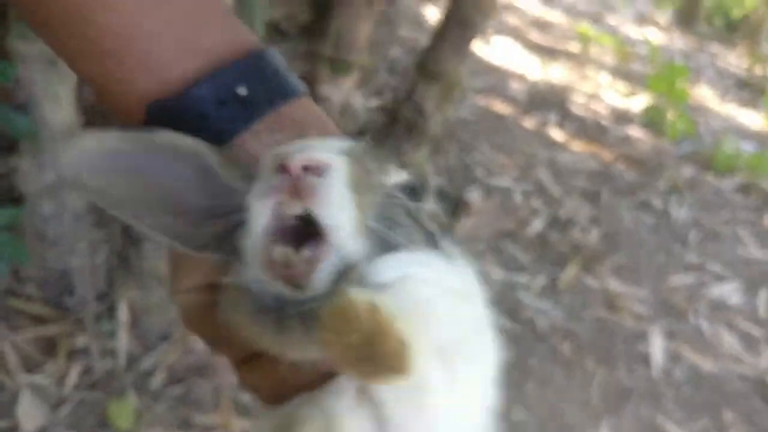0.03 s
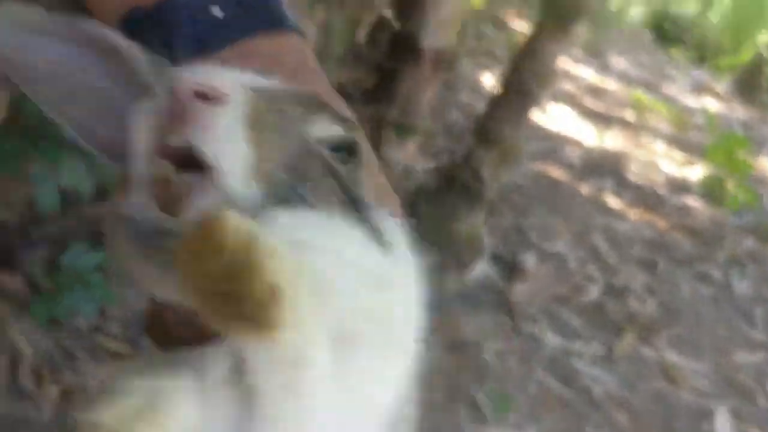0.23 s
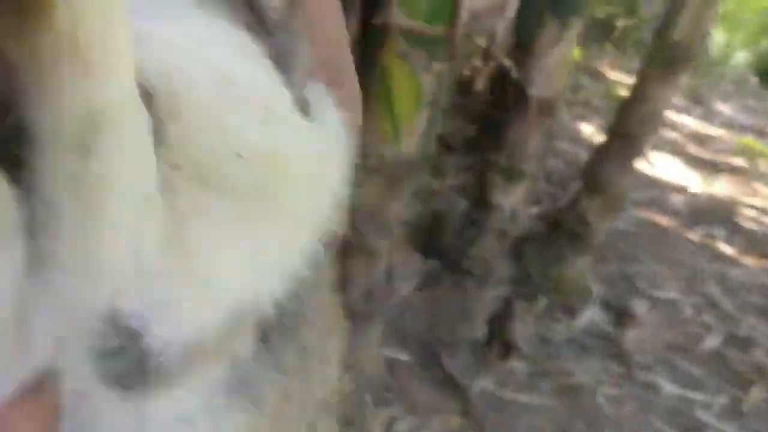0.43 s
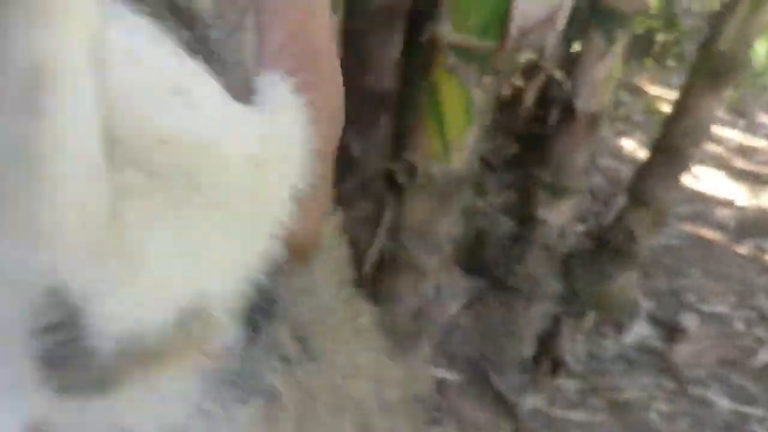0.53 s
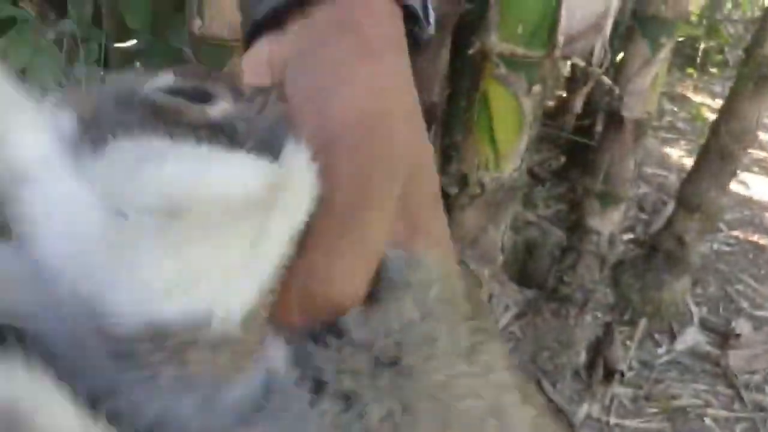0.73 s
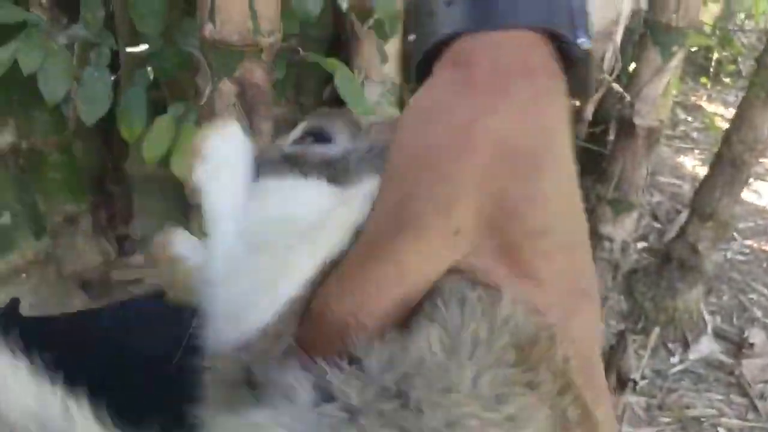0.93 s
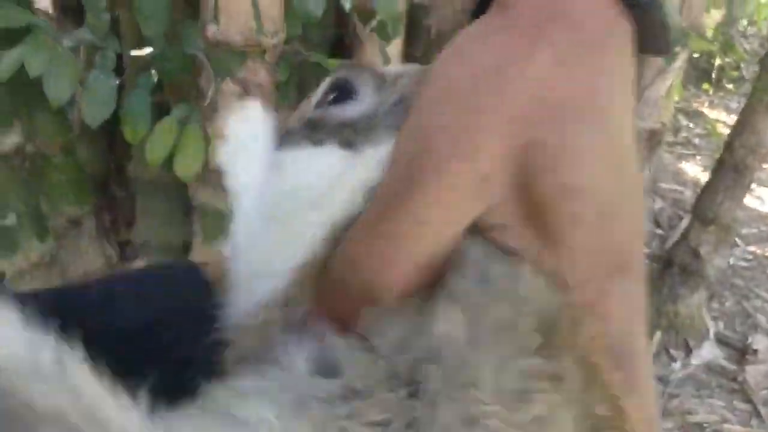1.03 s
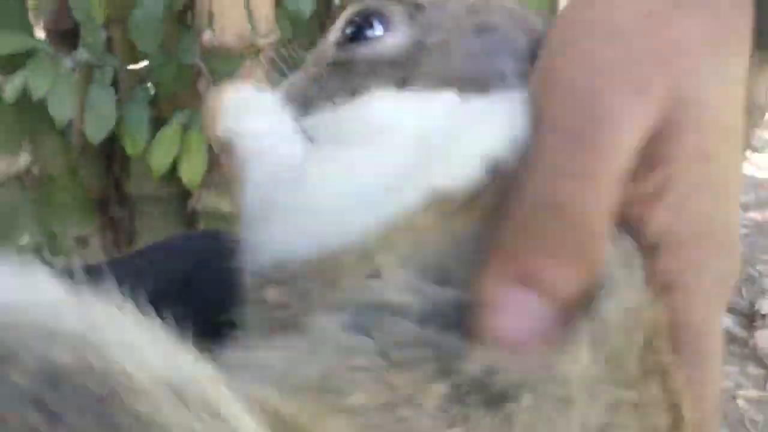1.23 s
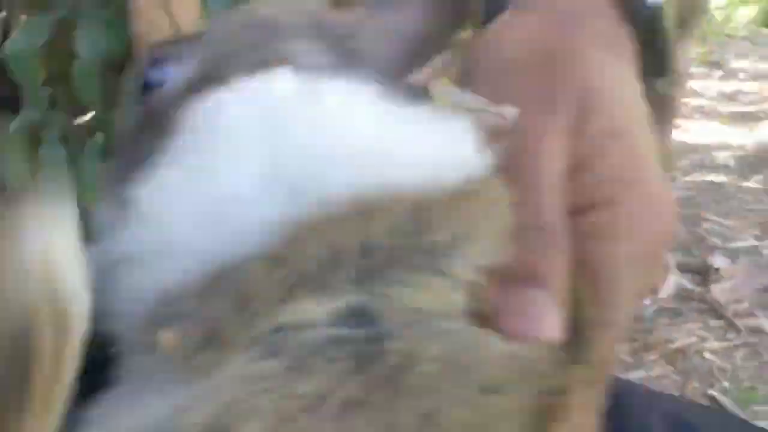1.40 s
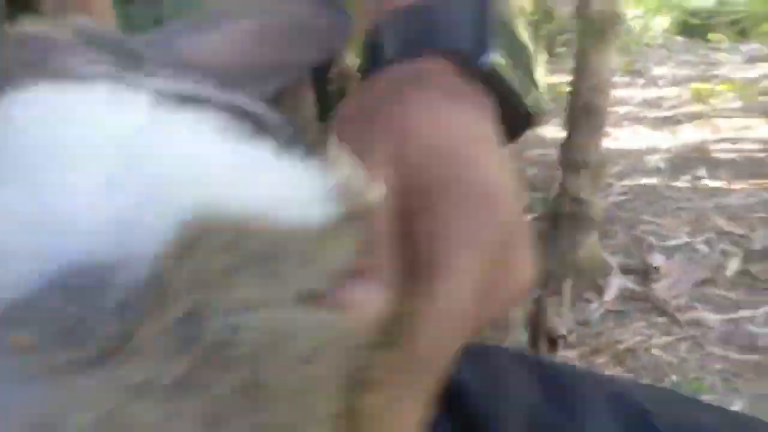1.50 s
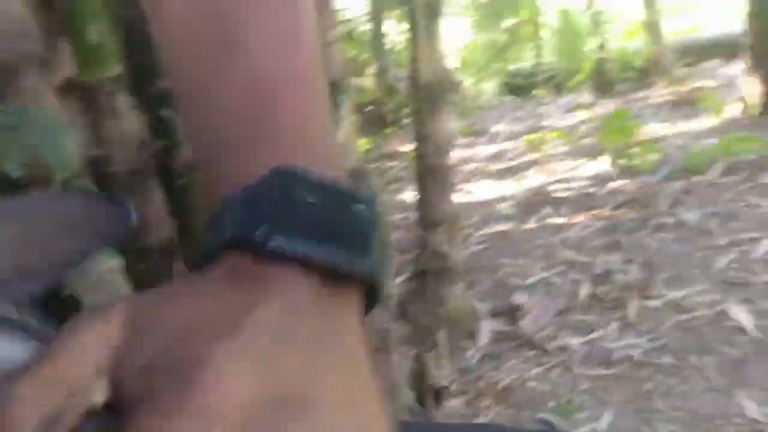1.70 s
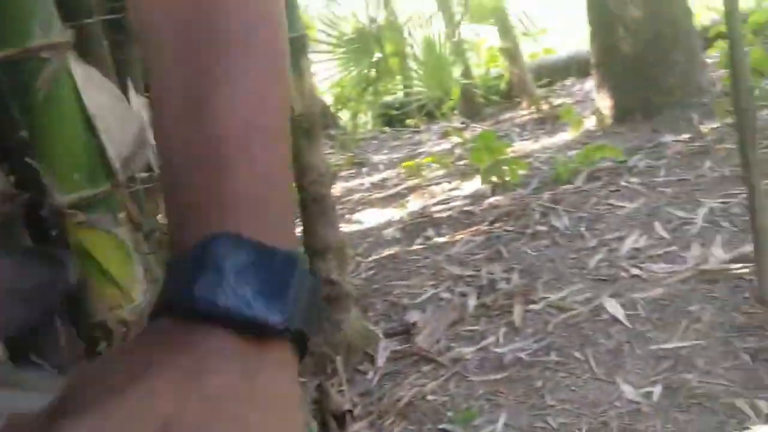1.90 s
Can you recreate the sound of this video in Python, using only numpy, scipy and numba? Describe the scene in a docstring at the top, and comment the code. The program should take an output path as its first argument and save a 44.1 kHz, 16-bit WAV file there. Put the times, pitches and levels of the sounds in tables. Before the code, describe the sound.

A rabbit screams three times, close and shrill. From about 0.15 seconds a faint, thin whistle rises and wavers, bursting at 0.5 into a short, bright, piercing rasp until 0.63. A longer, rough, fluttering squeal runs from 0.78 to 1.19. The third, from 1.41 to 1.76, briefly clears to a whistle, then rasps and drops. Faint rumble, hiss and soft bumps fill the quiet woodland gaps.

```python
"""Rabbit screaming in woodland

A held rabbit screams three times, close to a phone's microphone among quiet trees.
Its voice is a thin clean whistle of harmonics that breaks into a rasp, where a slower, unsteady
flutter of the throat chops the tone and the rushing air, and moving resonances of the mouth ring.
A short diffuse smear blurs the rasp's treble, and trunks return a faint echo.
Behind it lie a low wavering rumble, a faint hiss and soft bumps."""
import sys
import numpy as np
from scipy import signal
from scipy.fft import rfft, irfft
from scipy.io import wavfile
from scipy.ndimage import uniform_filter1d, minimum_filter1d
from numba import njit

SR = 44100
rng = np.random.default_rng(int(sys.argv[2]) if len(sys.argv) > 2 else 0)


def master_out(mix):
    """Clip the mix to full scale and print it as 16-bit PCM to the path in sys.argv[1]."""
    frames = np.transpose(np.atleast_2d(mix))
    ceiling = np.clip(frames, -1, 1)
    pcm = np.round(ceiling * 32767).astype(np.int16)
    wavfile.write(sys.argv[1], SR, pcm)


N = 85995  # length in samples

# Clean whistling, one table per stretch, levels before the whistle's own gain:
# (time [s], pitch [Hz], first harmonic [dB], second harmonic [dB])
WHISTLES = [
    [(0.145, 1236, -41.5, -43), (0.173, 1488, -31, -28.5), (0.201, 1615, -35, -25), (0.249, 1653, -30, -28),
     (0.327, 1498, -31, -29), (0.379, 1692, -26.5, -20), (0.425, 1619, -27.5, -25.5),
     (0.461, 1651, -28.5, -21.5), (0.475, 1561, -32.5, -22), (0.5, 1610, -24.5, -13)],
    [(1.48, 1896, -23, -36), (1.494, 1845, -25, -32), (1.538, 1855, -24.5, -42.5),
     (1.548, 1940, -17.5, -59)],
]
# Throat and mouth during the rasp, one table per cry:
# (time [s], pitch [Hz], flutter [Hz], mouth resonance [Hz], roughness [0 = smooth])
THROAT = [
    [(.498, 1677, 620, 3100, 0.19), (.514, 1740, 685.2, 3260, 0.47), (.528, 1528, 769, 3480, 0.63),
     (.552, 1566, 804, 3296, 0.51), (.568, 1561, 708, 2850, 0.3), (.588, 1467, 639.6, 3000, 0.2),
     (.608, 1389, 562, 2810, 0.15), (.627, 1090, 479.7, 2246, 0.24)],
    [(.783, 842.5, 299.2, 990, 1.03), (.82, 1217, 653, 1846, 0.81), (.865, 1600, 679.6, 2365, 0.69),
     (.905, 1800, 728, 2808, 0.59), (.95, 1660, 898.1, 2580, 0.42), (.995, 1530, 880, 2300, 0.59),
     (1.065, 1595, 972, 2270, 0.76), (1.145, 1404, 900, 2444, 0.62), (1.172, 735.8, 819.6, 2405, 1.1)],
    [(1.413, 595, 602.5, 680.6, 0.3), (1.435, 1548, 251.1, 1731, 0.6), (1.472, 1859, 171.9, 1960, 0.57),
     (1.548, 1850, 250.1, 2180, 0.45), (1.562, 1738, 417, 2080, 0.32), (1.615, 1811, 503.3, 2350, 0.32),
     (1.645, 1801, 645.3, 2620, 1.23), (1.70, 1652, 556, 2255, 0.34), (1.715, 1598, 791, 2360, 0.4),
     (1.75, 1251, 869, 2080, 1.1)],
]
WHISTLE_FADE_S = 0.0079


def undb(db):
    """Decibels to gain."""
    return 10 ** (np.asarray(db) / 20)


def unit(x):
    """Scale to rms 1."""
    return x / np.sqrt(np.mean(x ** 2) + 1e-20)


def curves(rows):
    """Each column of a table after the first, joined by straight lines in time."""
    rows = np.array(rows, float)
    t = np.arange(N) / SR
    return [np.interp(t, rows[:, 0], column) for column in rows.T[1:]]


def gate(rows, fade_s):
    """Open from a table's first row to its last, with ramped edges."""
    t = np.arange(N) / SR
    to_nearest_edge = np.minimum(t - rows[0][0], rows[-1][0] - t)
    return np.clip(to_nearest_edge / fade_s + .5, 0, 1)


def band(x, lo_hz, hi_hz, order=3):
    """Band-pass without delay, by filtering forwards and backwards."""
    sos = signal.butter(order, [lo_hz, hi_hz], "band", fs=SR, output="sos")
    return signal.sosfiltfilt(sos, x, padtype=None)


def wander(hz):
    """Smooth chance of rms 1: noise low-passed at the given speed."""
    sos = signal.butter(2, hz, fs=SR, output="sos")
    return unit(signal.sosfilt(sos, rng.standard_normal(N)))


def shape(points):
    """(frequency [Hz], value) points spread over all frequency bins, on a log frequency scale."""
    hz, value = np.array(points, float).T
    bins_hz = np.arange(N // 2 + 1) * SR / N
    return np.interp(np.log(bins_hz + 1), np.log(hz), value)


def turn(hz):
    """Phase of an oscillator: its frequency summed over time."""
    return 2 * np.pi * np.cumsum(hz) / SR


@njit
def resonance(x, hz, width):
    """Band-pass with a moving centre: a state-variable filter retuned at every sample."""
    y, band_state, low_state = np.empty(len(x)), 0., 0.
    for i in range(len(x)):
        g, damping = np.tan(np.pi * hz[i] / SR), width / hz[i]
        v = (band_state + g * (x[i] - low_state)) / (1 + g * (g + damping))
        band_state = 2 * v - band_state
        low_state = low_state + 2 * g * v
        y[i] = damping * v
    return y


def ring(x, hz, width_hz):
    """A steep resonance: two equal ones in series, each of the given width."""
    hz = hz * np.ones(N)
    once = resonance(x, hz, float(width_hz))
    return resonance(once, hz, float(width_hz))


def rabbit():
    """The voice slides between whistle and rasp; a short diffuse smear, unrelated left and right, blurs its treble."""
    # Levels of overtones 3, 4, .. against the first harmonic, one row per whistle: (level [dB], ...)
    overtone_levels = [
        [-15.5, -33.5, -31.5, -38.5, -40.5, -34.5],
        [-11.5, -19.5, -25.5, -31, -29, -28],
    ]
    phase, flutter = folds()
    clean = sum(whistle(phase, rows, levels) for rows, levels in zip(WHISTLES, overtone_levels))
    whistling = sum(gate(rows, WHISTLE_FADE_S) for rows in WHISTLES)
    harsh = (1 - whistling) * rasp(phase, flutter)
    smear = scatter(harsh, db=-2, t60_s=0.027, lo_hz=3300, hi_hz=20400)  # of the rasp alone
    return clean + harsh + smear


def folds():
    """One vibration drives whistle and rasp; roughness lets the flutter bend it. Gives both phases."""
    jitter_hz = 490  # speed of the unsteadiness
    whistle_jitter, pitch_jitter, flutter_jitter = 0.0058, 0.0907, 0.343  # rms fractions; last two x roughness
    bend = 0.93  # radians of phase per unit of roughness
    hz, flutter_hz, _, rough = curves(np.vstack(THROAT))
    for rows in WHISTLES:
        even = gate(rows, WHISTLE_FADE_S)
        hz = hz + even * (curves(rows)[0] - hz)
        rough = rough * (1 - even)
    flutter = turn(flutter_hz * (1 + flutter_jitter * rough * wander(jitter_hz)))
    jitter = (whistle_jitter + pitch_jitter * rough) * wander(jitter_hz)
    phase = turn(hz * (1 + jitter)) + bend * rough * np.sin(flutter)
    return phase, flutter


def whistle(phase, rows, overtone_levels):
    """The folds vibrate evenly: a clean stack of harmonics whose weak overtones waver."""
    _, first, second = curves(rows)
    levels = [first + 4.5, second + 2.5]
    for db in overtone_levels:
        waver = 4 * wander(18.6)
        flicker = -0.5 * np.tanh(wander(350))  # fast unevenness makes the overtones airy
        levels.append(first + db + waver + flicker)
    voice = 0
    for k, db in enumerate(levels, 1):
        voice = voice + undb(db + 0.13 * wander(60)) * np.sin(k * phase)
    return np.sqrt(2) * voice * gate(rows, WHISTLE_FADE_S)


def rasp(phase, flutter):
    """The flutter chops tone and rushing air; moving resonances ring, and each band follows its level."""
    # Rasp bands: (low edge [Hz], high edge [Hz])
    bands = [(330, 1350), (1350, 1920), (1920, 2850), (2850, 4400), (4400, 6700), (6700, 16000)]
    # Level in each band before the rasp's gain, one table per cry:
    # (time [s], then level [dB] of each band from the lowest to the highest)
    band_levels = [
        [(0.492, -61, -46, -40, -14, -32, -30), (0.506, -34.5, -23.5, -17.5, -7.5, -39, -38.5),
         (0.525, -44, -21, -11, -2.5, -28, -33), (0.545, -42, -44, -14.5, -11, -29, -30),
         (0.562, -49, -25, -22.5, -9, -27.5, -31.0), (0.588, -44.5, -35.5, -28.5, -14.5, -26.0, -34.5),
         (0.618, -31.5, -36.0, -19, -24.5, -25.5, -43), (0.63, -42.0, -56.5, -64, -41.5, -71, -45)],
        [(0.778, -41.0, -32.5, -44, -56, -52, -53.0), (0.792, -24, -26.5, -27.5, -31, -38, -43.5),
         (0.822, -21, -16.5, -18, -22, -26.5, -40), (0.862, -38.5, -22.5, -7, -22.5, -24, -26.5),
         (0.935, -36, -25.5, -9.5, -19.5, -27, -31.0), (0.985, -34.5, -28, -24, -30, -23.5, -36),
         (1.015, -34, -24, -29, -29.0, -23.5, -32.5), (1.08, -36.5, -30.5, -21, -22.5, -33.5, -38),
         (1.165, -35.5, -34, -29, -22.5, -31.5, -36), (1.187, -38, -44, -29, -33.5, -51, -61)],
        [(1.412, -31.0, -24, -40, -40.5, -38, -40.5), (1.425, -28.5, -32.5, -28.5, -45, -43.5, -43.5),
         (1.475, -41, -20.5, -23, -25.5, -41, -44.0), (1.542, -56.0, -27, -11.5, -41, -50, -40.0),
         (1.555, -34.5, -26, -11, -34, -36.5, -44.0), (1.605, -32, -28.5, -10, -32.5, -38, -37.5),
         (1.66, -41.5, -32.0, -15.5, -23, -34.5, -38), (1.705, -31.5, -40.5, -12, -28.5, -32, -40.5),
         (1.738, -34, -42, -19.5, -28.5, -47, -55), (1.762, -58, -62, -46, -48.0, -51, -58)],
    ]
    # Movement of jaw and lips: (time [s], upper resonance [Hz], centre of the lip hiss [Hz])
    jaw = [(.55, 5170, 7600), (.62, 5310, 7300), (.79, 4270, 5900), (.865, 5400, 8450), (.92, 5290, 9720),
           (1.02, 5090, 7400), (1.1, 5410, 12320), (1.17, 5520, 14100), (1.42, 5330, 8450),
           (1.58, 5140, 11000), (1.7, 5620, 11930)]
    rasp_db, fade_s, steady_s = -1.96, 0.0073, 0.035

    _, _, mouth_hz, rough = curves(np.vstack(THROAT))
    upper_hz, hiss_hz = curves(jaw)
    shimmer = undb(-1 * rough * np.tanh(wander(140)))
    chop = np.exp(0.7 * np.cos(flutter)) * shimmer
    tone = sum(np.sin(k * phase) / k ** 0.95 for k in range(1, 4))
    breath = undb(2) * rough * rng.standard_normal(N)
    source = chop * tone + np.sqrt(chop) * breath

    # treble hiss of air at the lips, with a steady resonance at the teeth
    air = chop ** 0.29 * rng.standard_normal(N)
    hiss = ring(air, hiss_hz, 4500) + undb(-10.5) * ring(air, 14700, 2100)

    voice = ring(source, mouth_hz, 1215)
    voice = voice + undb(-9) * ring(source, 0.639 * upper_hz, 1520)  # middle moves with upper
    voice = voice + undb(12.5) * ring(source, upper_hz, 1000)
    voice = voice + undb(-1.5) * rough * hiss
    voice = voice + undb(-12) * source  # leaks past the resonances

    out = 0
    for (lo_hz, hi_hz), db in zip(bands, curves(np.vstack(band_levels))):
        part = band(voice, lo_hz, hi_hz, order=4)
        power = uniform_filter1d(part ** 2, int(steady_s * SR))
        steady = part / np.sqrt(np.abs(power) + 1e-12)
        out = out + steady * undb(db + rasp_db)
    return out * sum(gate(rows, fade_s) for rows in band_levels)


def ports(x):
    """Two microphone ports differ in level by frequency; the right one lags, and head turns shift the balance."""
    # Left against right port: (frequency [Hz], left minus right [dB])
    port_balance = [(100, 12), (1000, 3.5), (1350, -3.5), (1650, -16.5), (1850, -27), (2050, 2), (2500, 2),
                    (3200, -6.5), (3800, 4), (4700, -0.5), (6000, 3.5), (8000, 10), (12000, 9), (15000, 33)]
    # Lag of the right port: (frequency [Hz], phase lag [rad])
    port_lag = [(100, 0.11), (1250, 0.86), (1640, 3.2), (1850, 5.46), (2100, 5.49), (2650, 5.05),
                (3400, 6.41), (4100, 8.67), (4600, 9.63), (6200, 11.9), (16000, 30.7)]
    # Turning of the head: (time [s], left minus right [dB])
    head = [(.2, 1.5), (.29, 2.5), (.45, 1.5), (.55, 2), (.83, -1), (.95, 1.5), (1.12, 1), (1.5, 1),
            (1.68, -1.5)]
    ratio = undb(shape(port_balance))
    responses = np.array([ratio, np.exp(-1j * shape(port_lag))])
    even_power = np.sqrt(2 / (1 + ratio ** 2))
    pair = irfft(rfft(x) * responses * even_power, N)
    pan_db, = curves(head)
    return pair * undb(np.array([pan_db, -pan_db]) / 2)


def scatter(x, db, t60_s, lo_hz, hi_hz):
    """Dense noise tails that die away by 60 dB in t60_s, unrelated left and right."""
    t = np.arange(SR // 2) / SR
    noise = band(rng.standard_normal((2, len(t))), lo_hz, hi_hz, order=1)
    tails = noise * np.exp(-np.log(1000) * t / t60_s)
    sides = np.array([signal.fftconvolve(x, unit(tail))[:N] for tail in tails])
    return undb(db) * sides / np.sqrt(len(t))


def background():
    """Shaped noise wavers as rumble and faint hiss; short noise swells, three low and one higher, are soft bumps."""
    # Relative spectrum of the background: (frequency [Hz], level per Hz [dB])
    spectrum = [(25, -3), (48, 5), (84, 0.5), (394, -15.5), (962, -15), (1260, -17.5), (1650, -24),
                (1890, -16), (2110, -24), (3430, -27.5), (4870, -33.5), (6560, -45.5), (7920, -47),
                (14800, -40), (16000, -38)]
    # Soft bumps, before the side balance; the band runs from hz / 6.1 to hz * 1.74:
    # (time [s], level [dB], reference frequency [Hz], half-length to 1/e [s])
    bump_table = [(0.341, -32, 197, 0.0082), (0.758, -37.5, 100, 0.072), (0.99, -33, 85, 0.035),
                  (1.301, -44.5, 1440, 0.0089)]
    level_db, waver_db, side_db, left_minus_right_db = -41.5, 4, -9, 2
    t = np.arange(N) / SR
    mid, side = (unit(irfft(rfft(rng.standard_normal(N)) * undb(shape(spectrum)), N)) for _ in range(2))
    stereo = mid + undb(side_db) * side * np.array([[1], [-1]])
    air = undb(level_db + waver_db * wander(1.67)) * stereo
    bumps = 0
    for at, db, hz, length in bump_table:
        noise = unit(band(rng.standard_normal(N), hz / 6.1, hz * 1.74, order=2))
        bumps = bumps + undb(db) * noise * np.exp(-((t - at) / length) ** 2)
    return (air + bumps) * undb(np.array([[left_minus_right_db], [-left_minus_right_db]]) / 2)


def scene():
    """The rabbit at the microphone, its faint echo among the trunks and the background."""
    voice = rabbit()
    trunks = scatter(voice[0], db=-16, t60_s=0.1, lo_hz=380, hi_hz=7300)
    return ports(voice) + trunks + background()


def record(dry):
    """The phone cuts the deepest rumble, limits the peaks and cuts the top."""
    rumble_cut_hz, top_hz = 44, 15900
    ceiling, limit_s = 0.86, 0.00043
    x = signal.sosfilt(signal.butter(5, rumble_cut_hz, "high", fs=SR, output="sos"), dry)
    span = int(limit_s * SR)
    peak = np.abs(x).max(axis=0)  # the louder side sets the gain of both
    needed = ceiling / np.maximum(peak, ceiling)
    gain = uniform_filter1d(minimum_filter1d(needed, span), span)
    return signal.sosfilt(signal.ellip(10, .2, 80, top_hz, fs=SR, output="sos"), x * gain)


dry = scene()
out = record(dry)
master_out(out)
```